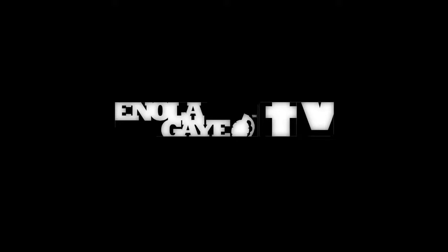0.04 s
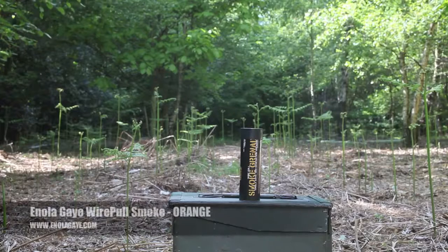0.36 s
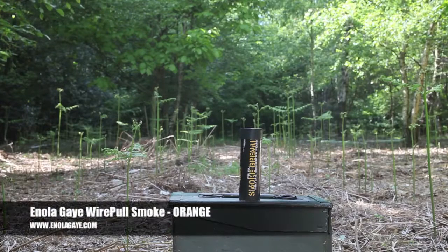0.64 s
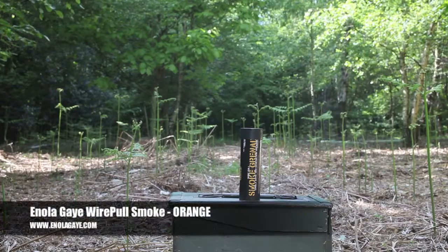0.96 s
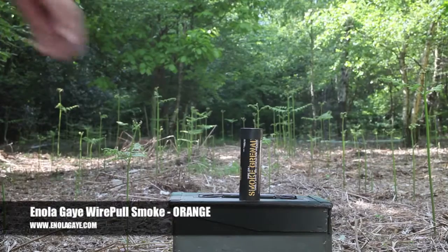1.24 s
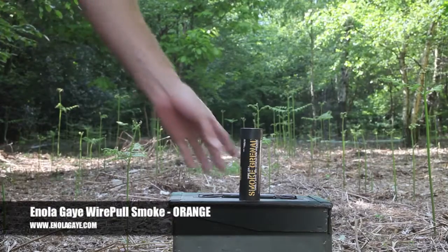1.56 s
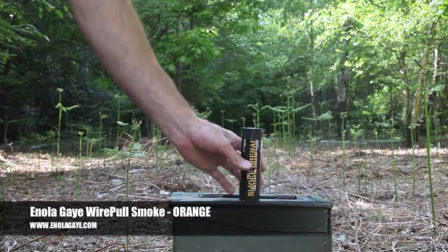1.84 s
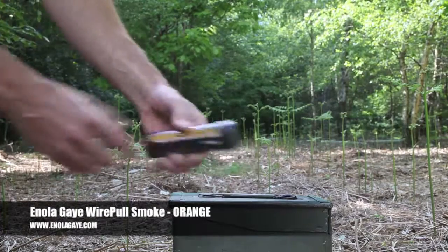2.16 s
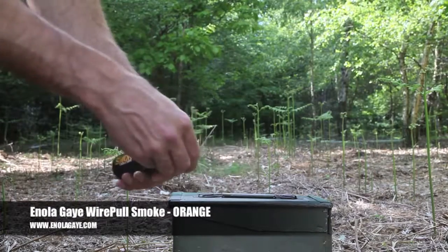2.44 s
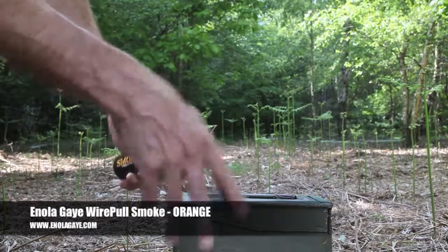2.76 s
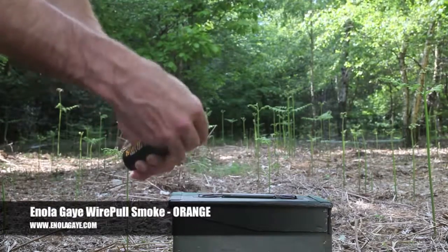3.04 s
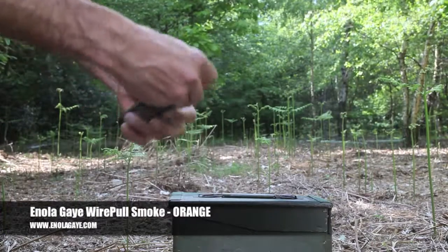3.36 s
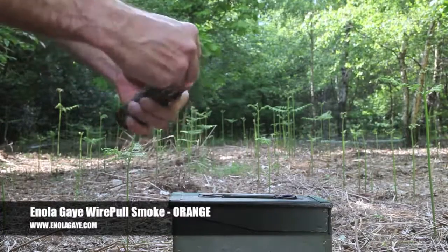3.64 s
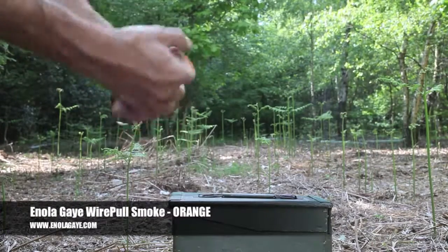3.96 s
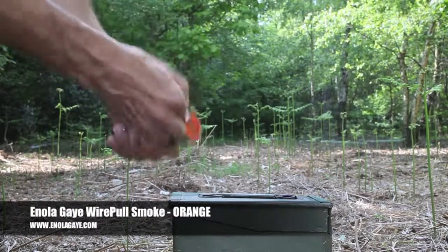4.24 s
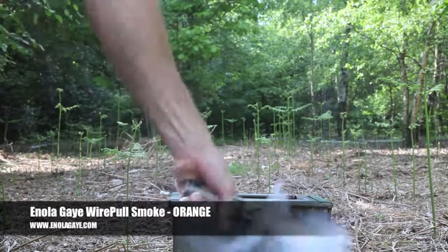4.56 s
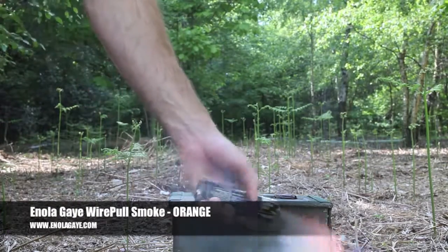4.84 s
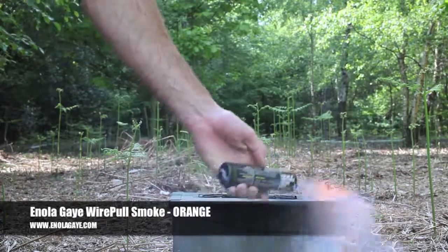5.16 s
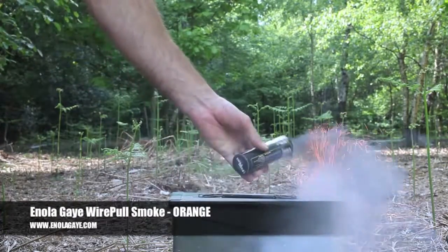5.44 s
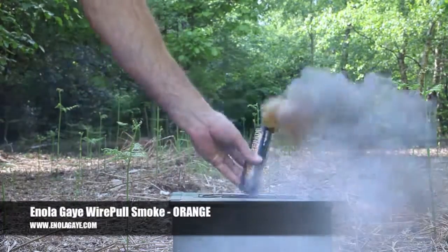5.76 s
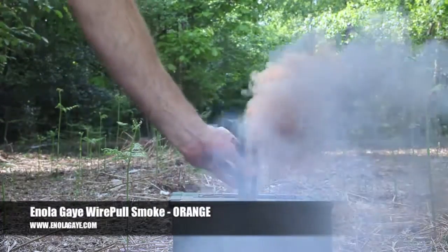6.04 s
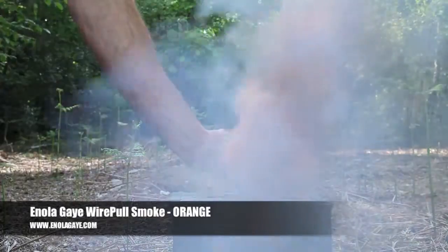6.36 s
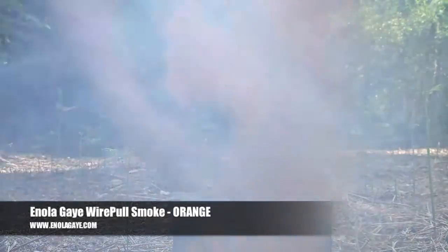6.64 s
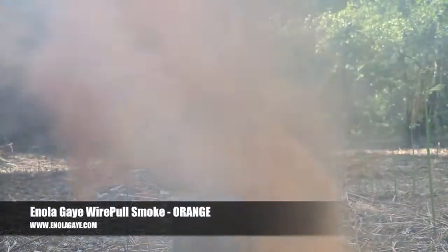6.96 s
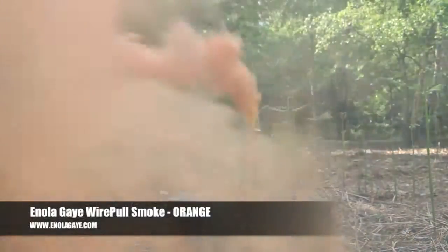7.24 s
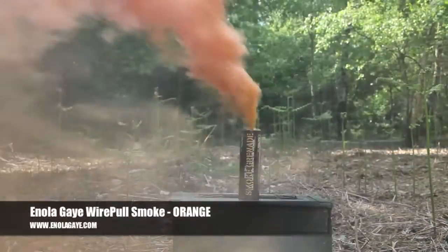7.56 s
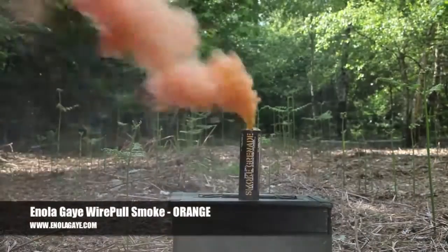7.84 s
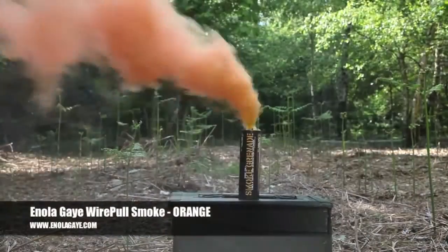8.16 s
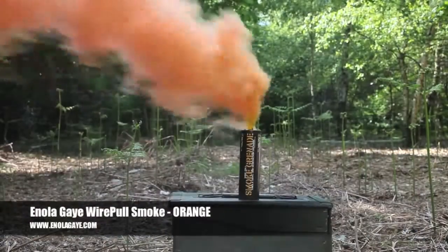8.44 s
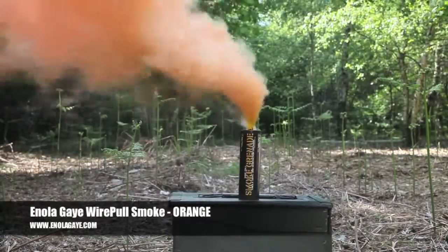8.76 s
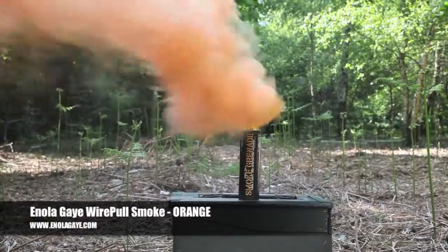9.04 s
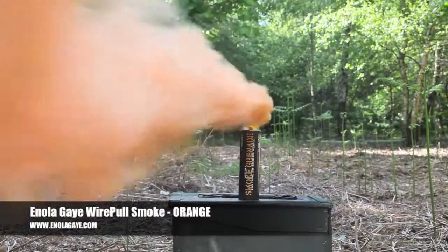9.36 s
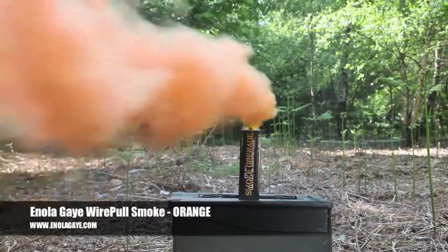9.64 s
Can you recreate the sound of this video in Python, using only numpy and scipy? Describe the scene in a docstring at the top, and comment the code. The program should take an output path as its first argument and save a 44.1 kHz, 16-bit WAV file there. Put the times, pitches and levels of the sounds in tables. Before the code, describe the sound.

A smoke canister is lit outdoors among trees, with traffic humming far away. Steps on dry leaves come first, then light handling clicks and the snap of a plastic cap. The igniter cracks sharply and a sputtering hiss begins, dipping as the can is set on a metal box. More twigs break underfoot while the jet swells into a sizzling rush and air rumbles against the nearby microphone.

```python
"""In a wood, with far traffic behind, a smoke canister is lit. Steps fracture dry leaves and twigs;
the plastic cap snaps off and the pull-wire igniter cracks, each ringing in its own damped modes.
Turbulent gas hisses from the vent as the can is swung upright and set on a metal box, and the jet
grows while air buffets the microphone. A gain control ducks after each loud snap."""
import sys
import numpy as np
from scipy import signal
from scipy.fft import rfft, irfft, next_fast_len
from scipy.io import wavfile
from scipy.ndimage import uniform_filter1d

SR = 44100
rng = np.random.default_rng(int(sys.argv[2]) if len(sys.argv) > 2 else 0)


def store_wav(level_fs):
    """Save 16-bit WAV to argv[1]."""
    pcm = np.round(np.clip(np.atleast_2d(level_fs), -1, 1) * 32767)
    wavfile.write(sys.argv[1], SR, pcm.T.astype(np.int16))


N = 436590


# roar of the gas flow, and sizzle of the particles in it: time_s, level_db
ROAR_LEVEL = [(4.47, -18.5), (4.75, -24), (5.0, -21.5), (5.45, -23.5), (5.6, -28), (5.88, -29), (5.98, -35),
              (6.6, -30.5), (7.2, -28.5), (7.6, -25), (7.72, -29.5), (8.3, -25), (8.65, -26), (9.2, -23),
              (9.7, -18.5), (9.9, -22)]
SIZZLE_LEVEL = [(4.47, -32), (4.75, -37.5), (5.3, -35.5), (5.95, -60), (6.6, -43.5), (7.55, -41),
                (8.2, -29.5), (8.95, -26.5), (9.27, -35), (9.5, -30), (9.9, -28.5)]
# shift of the young jet's resonances as the can swings up: time_s, pitch_ratio
SWING_GLIDE = [(4.45, 1.02), (4.7, 1.0), (5.1, 0.94), (5.24, 1.14), (5.48, 1.39), (5.85, 1.55)]
# upright jet's part of the roar: time_s, power_share
UPRIGHT_SHARE = [(5.45, 0.17), (6.1, 0.95)]

def vent():
    """Jet noise: turbulent gas roars, its particles sizzle, and uneven burning shakes both together."""
    ignition_s, catch_s = 4.42, .06
    burning = np.clip((np.arange(N) / SR - ignition_s) / catch_s, 0, 1)
    flare_roar_power, flare_sizzle_power, spurts = flares()
    roar_gain = burning * np.sqrt(from_db(in_time(ROAR_LEVEL)[0]) ** 2 + flare_roar_power)
    sizzle_gain = burning * np.sqrt(from_db(in_time(SIZZLE_LEVEL)[0]) ** 2 + flare_sizzle_power)
    glide, = in_time(SWING_GLIDE)
    upright, = in_time(UPRIGHT_SHARE)
    jet = np.sqrt(1 - upright) * young_jet(glide) + np.sqrt(upright) * upright_jet()
    sputter = drift(25)
    roar = roar_gain * from_db(sputter) * jet
    sizzle = sizzle_gain * from_db(0.46 * sputter) * particles()
    return roar + spurts + box_reflection(sizzle, glide, upright)


# resonances of the young jet, before the glide: pitch_hz, level_db
JET_RESONANCES = [(1080, -1), (1780, 5), (2450, 3), (3180, 3.5), (3780, -3), (6250, 2)]
# plain hiss relative to those resonances: time_s, level_db
HISS_FILL = [(4.5, -2), (4.9, -1), (5.3, 2), (5.7, 5)]
# spectrum of the jet lying low: frequency_hz, level_db
LOW_JET_SPECTRUM = [(100, -13), (300, -2), (500, -7.5), (900, 3), (1600, -5.5), (2600, -1.5), (3300, 0),
                    (3850, 2), (4400, -13), (6000, -14.5), (15000, -40)]

def young_jet(glide):
    """Resonant turbulence: hollow gliding bands fill in with hiss as the can swings up; steady power."""
    bands = sum(from_db(db) * whistle(hz * glide, width_hz=280) for hz, db in JET_RESONANCES)
    hiss = from_db(in_time(HISS_FILL)[0]) * rng.standard_normal(N)
    jet = colour(rms_one(bands) + hiss, LOW_JET_SPECTRUM)
    return jet / np.sqrt(uniform_filter1d(jet ** 2, size=SR // 5))


# air resonances of the venting tube: pitch_hz, width_hz, level_db
AIR_RESONANCES = [(742, 306, 1), (1385, 170, 6), (2045, 160, 2.5), (3050, 700, -11), (3600, 330, -2)]
# spectrum of the upright jet: frequency_hz, level_db
UPRIGHT_JET_SPECTRUM = [(100, 7.5), (200, 1.5), (450, -5.5), (750, -4), (1100, -5.5), (1450, -5), (2500, 0),
                        (3100, 1), (3650, -1.5), (4400, -10), (6000, -19), (15000, -38)]

def upright_jet():
    """Air-column resonance: the tube adds steady hollow peaks to broadband turbulence."""
    hollow = sum(from_db(db) * resonate(rng.standard_normal(N), hz, width_hz)
                 for hz, width_hz, db in AIR_RESONANCES)
    hiss = colour(rng.standard_normal(N), UPRIGHT_JET_SPECTRUM)
    return rms_one(hiss + from_db(1.0) * colour(hollow, UPRIGHT_JET_SPECTRUM))


# spectrum of the sizzle: frequency_hz, level_db
SIZZLE_SPECTRUM = [(2000, 5.5), (4500, 6), (6500, 1), (9000, -0.5), (11000, -3.5), (14000, -5.5),
                   (16000, -13)]

def particles():
    """Shot noise: particles carried out with the gas make random impulses over a hiss."""
    return colour(grains(per_s=1800, spread_db=2.5) + rng.standard_normal(N), SIZZLE_SPECTRUM)


def box_reflection(sizzle, glide, upright):
    """Comb filtering: an inverted echo off the box comes sooner and weaker as the can swings up."""
    lag_s = .00147 / glide
    echo = np.interp(np.arange(N) - lag_s * SR, np.arange(N), sizzle)
    return sizzle - .4 * (1 - upright) * echo


# flares of the charge: full_s, hold_s, roar_db, spurt_hz, sizzle_db
CHARGE_FLARES = [(4.585, 0.034, -18, 3330, -23.5), (4.909, 0.017, -17.5, 3260, -23.5),
                 (5.168, 0.0094, -21, 3400, -28.5), (5.355, 0.0092, -19.5, 3320, -24.5),
                 (5.4, 0.055, -26, 3450, -30.5), (6.627, .015, -30, 3430, -45),
                 (7.486, .01, -27.5, 4000, -46), (8.712, 0.049, -26, 3500, -31),
                 (8.845, 0.036, -29, 3530, -26.5), (9.595, 0.069, -25, 3050, -25),
                 (9.767, .03, -21, 2520, -31)]

def flares():
    """Unsteady combustion: each flare adds power to roar and sizzle, and a narrow spurt of hiss."""
    roar_power, sizzle_power, spurts = 0, 0, 0
    noise = rng.standard_normal(N)
    for s, hold_s, roar_db, hz, sizzle_db in CHARGE_FLARES:
        shape = swell(s, hold_s, attack_s=0.025, t60_s=0.2)
        roar_power += (from_db(roar_db) * shape) ** 2
        sizzle_power += (from_db(sizzle_db) * shape) ** 2
        spurts += from_db(roar_db - 5) * shape * rms_one(resonate(noise, hz, 0.12 * hz))
    return roar_power, sizzle_power, rolloff(spurts, 7000, "low")


# thin hiss of the fuse: time_s, pitch_hz, level_db
FUSE_HISS = [(4.45, 13500, -70), (4.56, 12600, -32), (4.7, 11400, -34), (4.85, 10000, -39.5),
             (5.05, 9300, -57), (5.3, 9100, -72)]

def fuse():
    """Band-limited noise: the fuse's hiss falls in pitch as it fades."""
    hz, db = in_time(FUSE_HISS, left=-140, right=-140)
    return from_db(db) * whistle(hz, width_hz=2900)


# the wire dragging, then the igniter firing: start_s, level_db
IGNITER_CRACKS = [(4.4137, -13), (4.4222, -18), (4.4268, 7), (4.4281, 9), (4.4315, 12), (4.4375, -2)]
# modes of its tube: pitch_hz, level_db, t60_s
IGNITER_MODES = [(716, -18, 0.02), (1260, -15, 0.017), (1600, -13, 0.017), (1980, -9, 0.028),
                 (2210, -6, 0.013), (2525, -8.5, 0.024), (3130, -1.5, 0.0078), (3530, -2.5, 0.015),
                 (6600, -17, .014), (7698, -14, 0.01)]

def igniter():
    """Impulse excitation: the pulled wire and the firing set the tube ringing."""
    return struck(IGNITER_CRACKS, IGNITER_MODES, crack_db=-6.5, crack_hz=2560, crack_t60_s=0.017)


# the cap snapping off: start_s, level_db
SNAPS = [(3.0493, -7.5), (3.2291, -1.5), (3.2578, -16), (3.2627, 6), (3.2680, 6.5), (3.2717, 3),
         (3.308, -5), (3.3228, -10)]
# modes of the cap: pitch_hz, level_db, t60_s
PLASTIC_MODES = [(403, -21.5, 0.014), (674, -16, 0.013), (1180, -16, 0.012), (1600, -14, 0.017),
                 (1873, -3, 0.02), (2050, -7.5, 0.019), (2330, -13, 0.017), (2780, -19.5, .013),
                 (3370, -15, 0.01), (3940, -24, 0.013), (5900, -29, .01)]

def cap():
    """Elastic release: each snap excites the heavily damped modes of the plastic."""
    return struck(SNAPS, PLASTIC_MODES, crack_db=-5, crack_hz=3560, crack_t60_s=0.0055)


# the can knocking on the box: start_s, level_db
BOX_KNOCKS = [(5.351, -22.5), (5.918, -16.5), (5.924, -25)]
# modes of the box: pitch_hz, level_db, t60_s
METAL_MODES = [(145, -8.5, 0.2), (208, -2, 0.11), (500, -11, 0.046), (925, -8, .03)]

def box():
    """Impact: the can, set down, rings the low modes of the metal box."""
    return struck(BOX_KNOCKS, METAL_MODES, crack_db=-8.0, crack_hz=3000, crack_t60_s=0.039)


# cap and pull ring scraping: start_s, peak_db, centre_hz, t60_s
CAP_AND_RING_SCRAPES = [(2.606, -19, 1700, 0.15), (3, -15, 9000, .02), (3.004, -23, 252, 0.1),
                        (3.005, -7.5, 6870, 0.039), (4.213, -19, 12000, .025), (4.2596, -6.5, 8000, 0.013),
                        (4.3654, -9.5, 8000, 0.022), (4.3683, -9, 5000, 0.024), (4.385, -27, 7000, 0.11),
                        (4.401, -21, 9000, 0.04), (4.410, -16, 7000, 0.09)]

def scrapes():
    """Sliding friction: each short slip gives a broad burst of noise."""
    out = np.zeros(N)
    for s, db, hz, t60_s in CAP_AND_RING_SCRAPES:
        add(out, s, from_db(db) * burst(hz, t60_s, width_ratio=2.2))
    return out


# the grip shifting on the can: full_s, level_db, hold_s
GRIP_RUBS = [(1.75, -48.5, 0.53), (2.595, -53, 0.2), (3.35, -49, 0.29), (4.35, -37, .08)]
# fingertips ticking on it: start_s, level_db, centre_hz
FINGER_TICKS = [(1.776, -21, 7000), (1.832, -23, 7000), (1.9455, -27, 11000), (2.3156, -14, 4950),
                (2.4447, -20, 6850), (2.4804, -18, 7360), (2.522, -18, 8900), (2.605, -22, 7000),
                (2.627, -13, 6900), (2.7404, -12.5, 7700), (2.789, -14.5, 9000), (2.810, -22, 8000),
                (2.858, -19, 7400), (2.967, -24, 9000), (3.248, -14, 10000)]

def fingers():
    """Contact noise: fingers rub and tick on the can; such small contacts radiate no bass."""
    grip = sum(from_db(db) * swell(s, hold_s, attack_s=0.076, t60_s=0.96) for s, db, hold_s in GRIP_RUBS)
    out = grip * grains(per_s=1200, spread_db=4) * from_db(4 * drift(15))
    for s, db, hz in FINGER_TICKS:
        add(out, s, from_db(db) * burst(hz, t60_s=0.0043, width_ratio=0.41))
    return rolloff(out, 3500, "high")


# feet pressing and brushing the litter: full_s, relative_db, hold_s, settling_t60_s
STEPS = [(0.225, -41.5, 0.027, 0.49), (0.468, -45, 0.035, 0.5), (0.77, -39.5, .01, .3),
         (.82, -28.5, .02, .3), (0.852, -25.5, 0.017, 0.3), (0.92, -28.5, 0.032, 0.53),
         (1.086, -36, .055, .4), (1.177, -30.5, 0.032, 0.33), (1.253, -35.5, 0.022, 0.52),
         (1.383, -36.5, 0.11, .3), (1.553, -35, 0.014, .4), (1.644, -36.5, 0.044, 0.31),
         (6.82, -42, .02, .3), (6.866, -32, 0.009, 0.3), (6.959, -32.5, 0.034, 0.49),
         (7.643, -31, 0.013, 0.12), (7.706, -36.5, .14, 0.38), (7.938, -27, 0.041, 0.075)]
# spectrum of crushed leaves: frequency_hz, level_db
LEAF_SPECTRUM = [(90, -18), (150, -10.5), (360, -12), (900, -6.5), (1700, -8), (2500, -8.5), (3600, -2),
                 (4400, -7.5), (7500, -6.5), (10000, -10.5), (14000, -15), (16000, -20.5)]

def footsteps():
    """Crackling noise: dry leaves break in clumps of tiny fractures under each footfall."""
    power = sum((from_db(db) * swell(s, hold_s, attack_s=0.052, t60_s=t60_s)) ** 2
                for s, db, hold_s, t60_s in STEPS)
    fractures = grains(per_s=3500, spread_db=5.5) + .9 * rng.standard_normal(N)
    clumps = from_db(5.5 + 1.1 * drift(76))
    return np.sqrt(power) * clumps * colour(fractures, LEAF_SPECTRUM)


# twigs breaking: start_s, peak_db, centre_hz
TWIG_CRACKS = [(0.4764, -13.5, 3370), (0.592, -22.5, 9000), (.8545, -5.5, 1200), (0.9719, -3.5, 2460),
               (.9735, -8, 456), (1.2053, -10, 3430), (1.314, -6, 3760), (1.3698, -10, 6000),
               (1.415, -8.5, 4000), (1.638, -11, 7000), (1.6846, -9.5, 6000), (7.639, -6, 3940),
               (7.665, -12, 4960), (7.667, -5, 14000), (7.752, -8.5, 3500), (7.8688, -3.5, 1800),
               (7.889, -10.5, 4540), (8.071, -18.5, 13000), (8.111, -6.5, 6000), (8.196, -6.5, 5900),
               (8.345, -8.5, 1200)]

def twigs():
    """Brittle fracture: each twig gives a sharp crack over a dull woody body."""
    out = np.zeros(N)
    for s, db, hz in TWIG_CRACKS:
        add(out, s, from_db(db) * burst(hz, t60_s=.008, width_ratio=1.1))
        add(out, s, from_db(db - 10.5) * burst(hz=720, t60_s=0.0098, width_ratio=1.6))
    return out


# strength of the buffeting: time_s, level_db
BUFFET_LEVEL = [(4.7, -69.5), (5.0, -32), (5.5, -47), (6.5, -52), (7.2, -54), (7.7, -50), (8.1, -32),
                (8.6, -34.5), (8.95, -20.5), (9.2, -25.5), (9.5, -18.5), (9.9, -16.5)]
# its spectrum: frequency_hz, level_db
BUFFET_SPECTRUM = [(11, -42), (18, -12), (32, 1), (50, -4), (84, -11), (157, -25.5), (300, -30), (390, -52),
                   (660, -120)]

def buffeting():
    """Turbulent pressure: air moving over the microphone makes a lumpy low rumble."""
    rumble = rolloff(colour(rng.standard_normal(N), BUFFET_SPECTRUM), 170, "low")
    return faded(BUFFET_LEVEL) * from_db(1.5 * drift(32)) * rms_one(rumble)


# strength of the traffic: time_s, level_db
TRAFFIC_LEVEL = [(.17, -100), (.21, -42.5), (.3, -35.5), (.6, -32.5), (1.9, -35.5), (2.8, -30.5),
                 (4.4, -32.5), (5.5, -36.5), (6.8, -33), (7.5, -38), (9.9, -47)]
# its spectrum: frequency_hz, level_db
TRAFFIC_SPECTRUM = [(25, -23), (38, -8), (59, -1.5), (82, -9.5), (130, -11.5), (160, -15.5), (250, -16.5),
                    (500, -24.5), (900, -14.5), (1350, -16.5), (2000, -25.5), (2900, -30.5), (3600, -25),
                    (4600, -35), (9000, -41.5), (16000, -50)]
# a far engine, relative to the traffic noise: pitch_hz, level_db
ENGINE_TONES = [(53.8, -2.5), (123.8, -14)]

def traffic():
    """Superposition: far vehicles merge into low noise, with one engine's slightly wavering drone."""
    out = colour(rng.standard_normal(N), TRAFFIC_SPECTRUM) * from_db(.5 * drift(6.9))
    for hz, db in ENGINE_TONES:
        phase = 2 * np.pi * np.cumsum(hz * (1 + 0.0152 * drift(2.55))) / SR
        out += np.sqrt(2) * from_db(db + 0.16 * drift(0.27)) * np.sin(phase)
    return faded(TRAFFIC_LEVEL) * out


def struck(hits, modes, crack_db, crack_hz, crack_t60_s):
    """Modal vibration: each blow gives a short crack and a sum of damped sinusoids."""
    out, t = np.zeros(N), np.arange(SR // 8) / SR
    for s, db in hits:
        ring = 0
        for k, (hz, mode_db, t60_s) in enumerate(modes):
            decay = from_db(mode_db + rng.normal() - 60 * t / t60_s)
            ring += (-1) ** k * decay * np.sin(2 * np.pi * hz * t)
        crack = from_db(crack_db) * burst(crack_hz, crack_t60_s, width_ratio=1.0)
        add(out, s, from_db(db) * (ring + crack))
    return out


def burst(hz, t60_s, width_ratio):
    """Exponentially decaying noise through one broad resonance, peak 1."""
    t = np.arange(SR // 8) / SR
    noise = rng.standard_normal(len(t)) * from_db(-60 * t / t60_s)
    band = resonate(noise, hz, width_ratio * hz)
    return band / np.abs(band).max()


def whistle(hz, width_hz):
    """Quadrature modulation: a band of noise round a gliding pitch, unit power."""
    phase = 2 * np.pi * np.cumsum(hz) / SR
    noise = rolloff(rng.standard_normal((2, N)), width_hz / 2, "low")
    return rms_one(noise[0] * np.cos(phase) + noise[1] * np.sin(phase))


def grains(per_s, spread_db):
    """A Poisson train of impulses of very unequal size, unit power."""
    sizes = from_db(spread_db * np.minimum(rng.exponential(1, N), 4))
    return rms_one(sizes * rng.choice([-1, 1], N) * (rng.random(N) < per_s / SR))


def drift(rate_hz):
    """Low-passed noise: a smooth random wandering, spread 1."""
    step, warm_up = 40, 2000
    r = np.exp(-2 * step * np.pi * rate_hz / SR)
    noise = rng.standard_normal(N // step + warm_up + 2)
    slow = signal.lfilter([1], [1, -2 * r, r * r], noise)[warm_up:]
    return np.interp(np.arange(N) / step, np.arange(len(slow)), rms_one(slow))


def colour(x, spectrum):
    """Spectral shaping by rows of frequency_hz, level_db; unit power."""
    hz, db = np.transpose(spectrum)
    size = next_fast_len(N)
    f = np.maximum(np.arange(size // 2 + 1) * SR / size, 1)
    gain = from_db(np.interp(np.log(f), np.log(hz), db)) * np.minimum(f / hz[0], 1) ** 2
    return rms_one(irfft(rfft(x, size) * gain, size)[:N])


def resonate(x, hz, width_hz):
    """A two-pole resonator, peak gain 1."""
    r = np.exp(-np.pi * width_hz / SR)
    feedback = [1, -2 * r * np.cos(2 * np.pi * hz / SR), r * r]
    return signal.lfilter(np.array([1, 0, -1]) * (1 - r * r) / 2, feedback, x)


def rolloff(x, hz, passband):
    """A second-order low-pass or high-pass filter."""
    return signal.sosfilt(signal.butter(2, hz, passband, fs=SR, output="sos"), x)


def swell(full_s, hold_s, attack_s, t60_s):
    """An envelope that rises until full_s, holds, then decays exponentially."""
    t = np.arange(N) / SR - full_s
    return np.clip(1 + t / attack_s, 0, 1) ** 2 * from_db(-60 * np.clip((t - hold_s) / t60_s, 0, 3))


def faded(rows):
    """Gain of a dB curve, silent before it begins."""
    return from_db(in_time(rows, left=-140)[0])


def in_time(rows, **ends):
    """Each column of a curve, interpolated at every sample."""
    s, *columns = np.transpose(rows)
    return [np.interp(np.arange(N) / SR, s, c, **ends) for c in columns]


def add(track, start_s, sound):
    """Mix a sound in at a time."""
    start = int(start_s * SR)
    track[start:start + len(sound)] += sound[:N - start]


def from_db(db):
    """Decibels to gain."""
    return 10 ** (np.asarray(db) / 20)


def rms_one(x):
    """Scale to unit power."""
    return x / np.sqrt(np.mean(x ** 2) + 1e-20)


def scene():
    """Linear superposition: all sources add, alike in both channels."""
    wood = traffic() + footsteps() + twigs()
    handling = fingers() + scrapes() + cap() + igniter() + box()
    mono = wood + handling + vent() + fuse() + buffeting()
    return np.array([mono, mono])


def gain_control(x, threshold_db, release_db_per_s, attack_s):
    """Compression: loud bursts pull the gain down within milliseconds; it creeps back afterwards."""
    r = np.exp(-1 / (attack_s * SR))
    power = signal.lfilter([1 - r], [1, -r], x[0] ** 2)
    excess_db = np.maximum(10 * np.log10(power + 1e-12) - threshold_db, 0)
    ramp = release_db_per_s * np.arange(N) / SR
    held_db = np.maximum.accumulate(excess_db + ramp) - ramp
    return x * from_db(-signal.lfilter([1 - r], [1, -r], held_db))


def record(dry):
    """Gain control, clipping of the sharpest cracks, and a steep cut of the top treble."""
    ducked = gain_control(dry, threshold_db=-12.0, release_db_per_s=17.5, attack_s=0.0018)
    lowpass = signal.ellip(10, .1, 80, 15900, fs=SR, output="sos")
    return signal.sosfilt(lowpass, np.clip(ducked, -1, 1))


dry = scene()
out = record(dry)
store_wav(out)
```